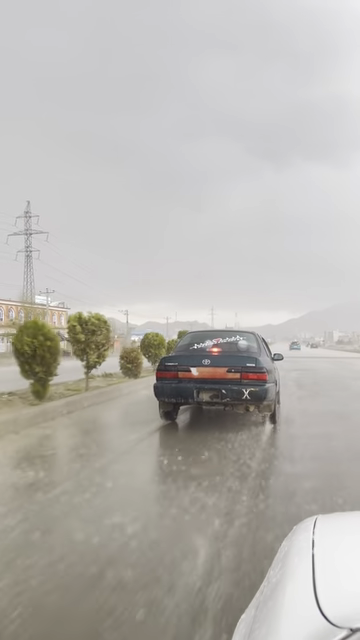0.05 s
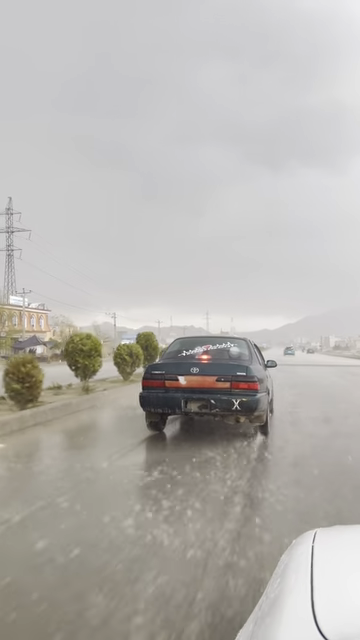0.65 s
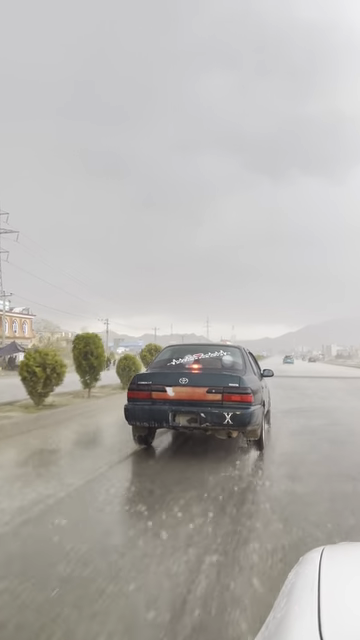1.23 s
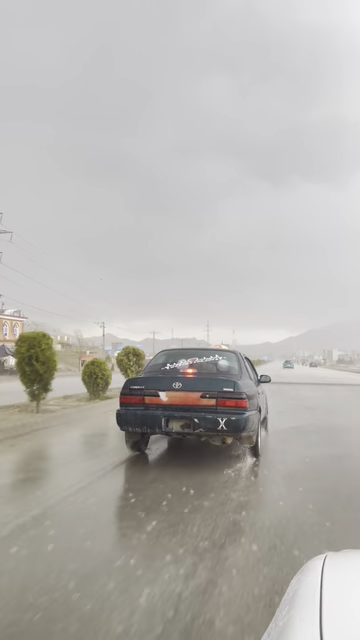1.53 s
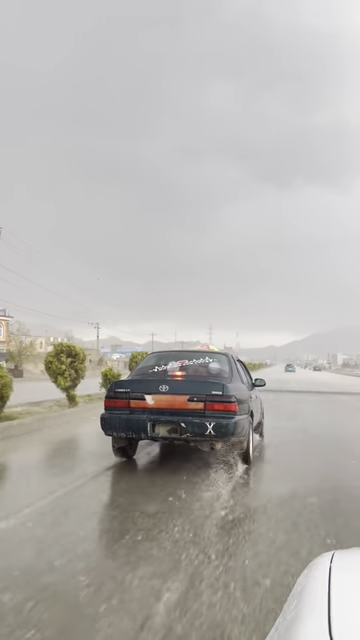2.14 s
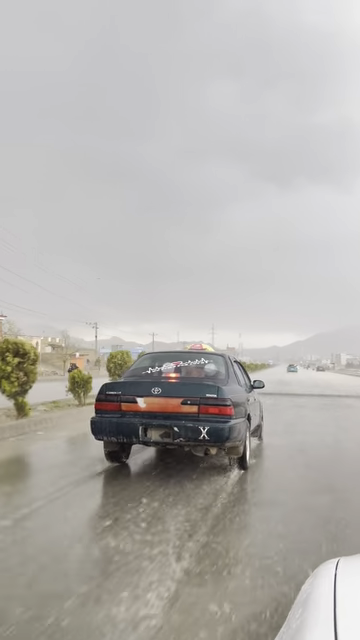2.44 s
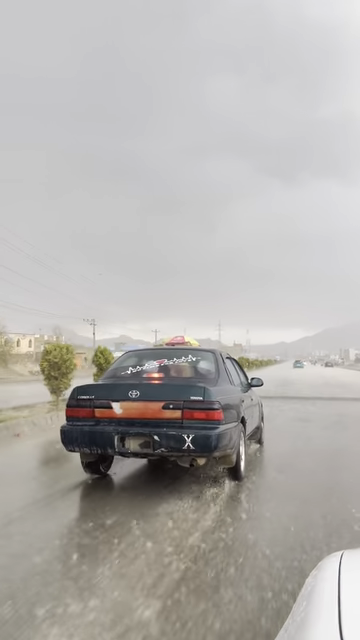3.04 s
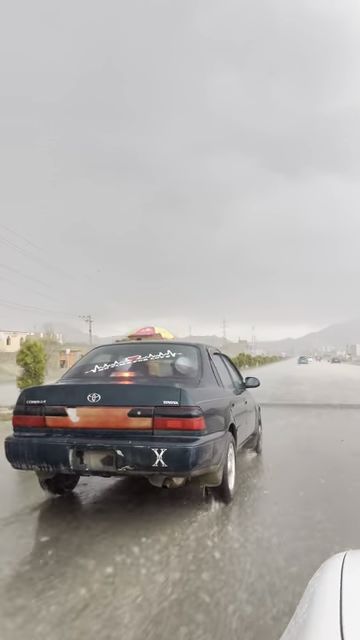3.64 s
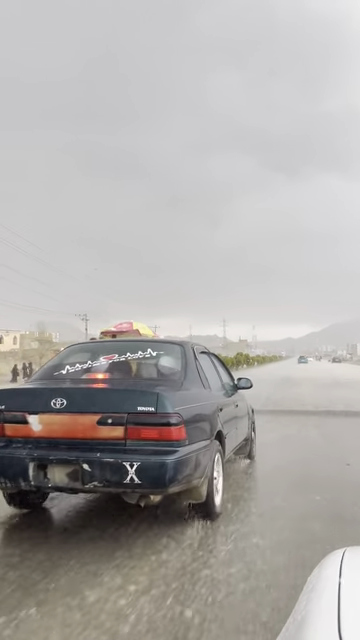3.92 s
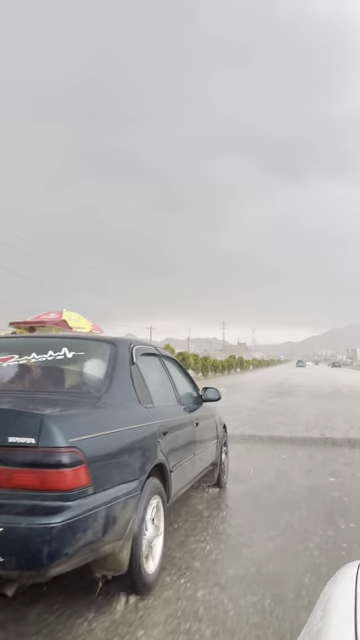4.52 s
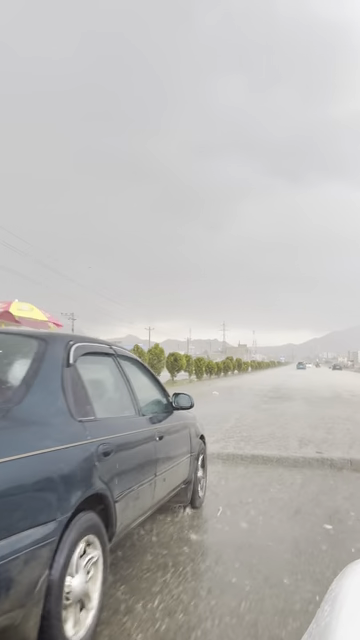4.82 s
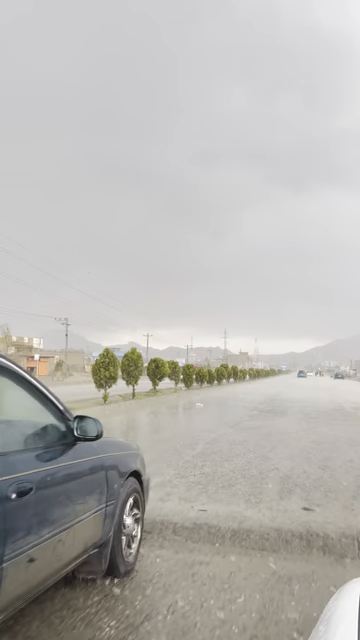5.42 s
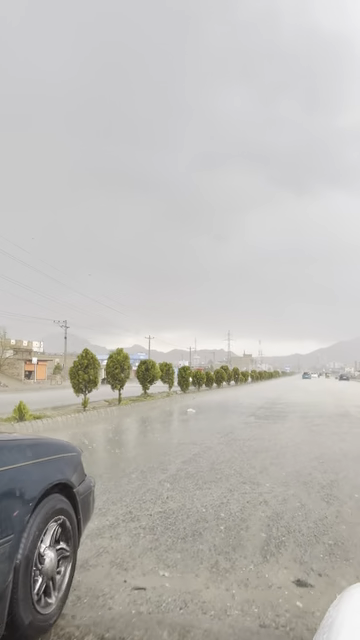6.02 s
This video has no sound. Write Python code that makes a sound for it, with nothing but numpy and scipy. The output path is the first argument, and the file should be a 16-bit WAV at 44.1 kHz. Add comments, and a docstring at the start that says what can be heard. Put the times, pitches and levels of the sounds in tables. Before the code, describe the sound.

From the open window of a slowing car on a wet road, rough, rumbling gusts hit the microphone, along with close slaps of raindrops. Rain and tyre spray hiss underneath, and a very high, raspy whistle pulses in lengthening swells. One heavy drop briefly ducks the wind, and later a hard gust cracks. The wind fades, ending with the short beginning of a brake squeal.

```python
"""Riding through heavy rain with a phone held at the open window of a car that slows almost to a stop.
From the start, wind buffets the two microphone ports in eddies, over the hiss of rain and tyre spray.
A thin, ragged whistle comes in, swelling about once a wheel turn. Droplets spatter the phone and big
drops slap it; one heavy hit briefly ducks the wind and spray. As the wind eases, the whistle's swells
grow longer and fray, one hard gust cracks at the ports, and at the very end a brake starts to squeal."""
import sys
import numpy as np
from scipy import signal
from scipy.fft import rfft, irfft, next_fast_len
from scipy.io import wavfile
from scipy.ndimage import uniform_filter1d, map_coordinates

SR = 44100
rng = np.random.default_rng(int(sys.argv[2]) if len(sys.argv) > 2 else 0)


def wav_record(signal):
    """Record a signal, one row per channel, as 16-bit PCM in the file named by sys.argv[1]."""
    frames = np.transpose(np.atleast_2d(signal))
    bounded = np.clip(frames, -1, 1)
    # unit amplitude maps onto the largest positive 16-bit level
    quanta = np.round(bounded * 32767).astype(np.int16)
    wavfile.write(sys.argv[1], SR, quanta)


N = 276366
TIME = np.arange(N) / SR
SIZE = next_fast_len(N + 4096)
FREQS = np.maximum(np.arange(SIZE // 2 + 1) * SR / SIZE, 1)

# each port's own small swirls against the shared wind, strongest in fast air: time_s, level_db
PORT_SWIRLS = [(0, -1.5), (.7, -1.5), (1, -50), (6.27, -15)]
# stereo width of the water sounds, side against mid: frequency_hz, side_db
WATER_WIDTH = [(80, 1.5), (700, -1), (2000, -16.5), (3300, -1.5), (5000, -6), (7000, -19), (9500, -47)]
# tone of a splash on the phone: frequency_hz, gain_db
SPLASH_COLOUR = [(200, -14), (1000, -6), (3000, -1), (6000, 1), (8000, -2), (10500, 5), (13000, -13),
                 (16000, -34)]


def undb(db):
    """Decibels to gain."""
    return 10 ** (np.asarray(db) / 20)


def unit(x):
    """Scale to rms 1."""
    return x / np.sqrt(np.mean(x ** 2) + 1e-20)


def curves(table):
    """One envelope for each value column of (time_s, value, ...) rows."""
    times, *columns = np.transpose(table)
    return [np.interp(TIME, times, column) for column in columns]


def shape(x, response):
    """Multiply the spectrum of x by a response."""
    return irfft(rfft(x, SIZE) * response, SIZE)[..., :N]


def colour(x, points):
    """Equalise x along (frequency_hz, gain_db) points."""
    hz, db = np.transpose(points)
    return shape(x, undb(np.interp(np.log(FREQS), np.log(hz), db)))


def butter(x, hz, kind, order=2):
    """Causal low-, high- or band-pass."""
    return signal.sosfilt(signal.butter(order, np.clip(hz, 5, .45 * SR), kind, fs=SR, output="sos"), x)


def band_rms(x, band_hz):
    """Rms of x between two frequencies."""
    return np.std(butter(x, band_hz, "bandpass", order=3))


def walk(rate_hz):
    """Smooth random wandering of spread 1."""
    return unit(shape(rng.standard_normal(N), 1 / (1 + (FREQS / rate_hz) ** 2)))


def flutter(x, depth_db):
    """Turn a wandering into a flickering gain of even short-term power."""
    gain = undb(depth_db * 2 * np.tanh(x / 2))
    return gain / np.sqrt(uniform_filter1d(gain ** 2, size=3500))


def ports(pair, width):
    """Two unrelated signals become left and right: one is the mid, the other, equalised, the side."""
    side = colour(pair[1], width)
    return np.array([pair[0] + side, pair[0] - side])


def add(out, x, start_s):
    """Mix x into out from start_s on."""
    i = int(np.clip(start_s * SR, 0, N - 1))
    out[..., i:i + x.shape[-1]] += x[..., :N - i]


def dip_db(recover_s=0.16):
    """How far wind and spray duck after the heaviest drops."""
    # level steps after a hit, negative for a slight lift: start_s, depth_db
    dips = [(.442, -0.5), (.656, -1), (2.363, 25)]
    return sum(depth_db * (TIME > s) * np.exp(-np.abs(TIME - s) / recover_s) for s, depth_db in dips)


def airflow(attack_s=0.018, release_s=0.0092):
    """Rumble and buffeting envelopes in dB: the steady flow, lifted by gusts and lowered by lulls."""
    # steady airflow, easing as the car slows: time_s, rumble_db, buffet_db
    steady_flow = [(0, -14.5, -17.5), (.17, -12.5, -26.5), (.45, -15, -21.5), (.7, -17, -24),
                   (.9, -18, -23.5), (1.35, -15.5, -27), (1.55, -22, -33.5), (1.72, -30.5, -38),
                   (1.95, -24, -31), (2.3, -24.5, -28), (2.6, -20, -27), (3.0, -26, -27.5),
                   (3.3, -31.5, -39), (3.65, -27.5, -34.5), (4.8, -26.5, -32.5), (5.75, -34.5, -46),
                   (6.1, -56, -56), (6.27, -45, -44)]
    # gusts on top of it: start_s, length_s, rumble_gain_db, buffet_gain_db
    gusts = [(0.197, 0.03, 0, 7), (0.255, 0.088, 1, 6), (0.961, 0.026, 6, 2.5), (1.045, 0.17, 4.5, 2),
             (2.096, 0.16, 7, 1), (2.264, 0.092, 9.5, 8), (2.705, 0.051, 5.5, 3.5), (3.045, 0.072, 7.5, 2),
             (3.14, 0.087, 3.5, -0.5), (3.443, 0.083, 5, 11), (3.606, 0.14, 1.5, 3), (4.044, 0.12, 1.5, 1),
             (4.387, 0.03, 6.5, 6), (4.47, 0.06, 4, -0.5), (4.59, 0.077, 7.5, -1), (4.943, 0.063, 9, 0),
             (5.027, 0.057, 6.5, 7), (5.185, 0.072, 9, 4), (5.266, 0.032, 4, 7), (5.418, 0.038, 11.5, 9.5),
             (5.554, 0.017, 10, 3), (5.648, 0.03, 8.5, 8)]
    # the airflow lets go of the phone: centre_s, half_width_s, depth_db
    lulls = [(0.128, 0.007, 14), (.175, 0.01, 2), (0.251, 0.018, 6.5), (.5, 0.0055, 7.5), (.83, 0.02, 2),
             (0.936, 0.015, 12), (1.132, 0.0048, 4), (2.672, .007, -1), (2.92, .015, 1), (2.99, 0.016, 0),
             (3.358, 0.026, 8), (3.59, 0.009, 4), (3.93, 0.0092, 3), (4.21, 0.022, 13.5), (4.42, 0.019, 10),
             (4.731, 0.0083, 18), (4.8, 0.031, 7.5), (4.905, .014, 1), (5.02, 0.0079, 5), (5.125, 0.019, 5),
             (5.385, .014, -1), (5.51, 0.024, 3), (5.615, 0.024, 8)]
    rumble, buffet = curves(steady_flow)
    for start, length, rumble_db, buffet_db in gusts:
        ramps = np.minimum((TIME - start) / attack_s, (start + length - TIME) / release_s)
        gust = np.clip(ramps + .5, 0, 1)
        rumble, buffet = rumble + rumble_db * gust, buffet + buffet_db * gust
    lull = dip_db() + sum(db * np.exp(-((TIME - s) / width) ** 2) for s, width, db in lulls)
    return rumble - lull, buffet - lull


def swirls(per_second=75, fade_s=0.00036):
    """Local air speed: it wanders, and jumps whenever a small vortex breaks on the phone."""
    kicks = (rng.random(N) < per_second / SR) * rng.uniform(0.14, 5.3, N)
    kicks = butter(signal.lfilter([1], [1, -np.exp(-1 / (fade_s * SR))], kicks), 330, "lowpass")
    return unit(unit(kicks - kicks.mean()) + 1.9 * walk(13.5) + 0.98 * walk(220))


def wind(rumble_db=1.5, hard_gust_db=-13, roar_db=3, merge=0.41):
    """Turbulence at the ports: each swirl starts with a rough edge, and the lows follow it."""
    # tone of the rushing air: frequency_hz, gain_db
    air_colour = [(20, -21), (40, -2.5), (70, 0.5), (130, -6), (250, -9.5), (350, -7.5), (700, -15),
                  (1300, -19.5), (2300, -22), (3500, -33.5), (5000, -35), (8000, -42), (10200, -49),
                  (13000, -111)]
    # four bands of air noise that trail the swirl: centre_hz, flutter_db, lag_ms
    registers = [(95.5, 2.5, 5.2), (335, 7, 3.1), (1020, 8, 3.15), (3900, 10.5, 3.1)]
    rumble, buffet = airflow()
    fast = undb(curves(PORT_SWIRLS)[0])
    noise = colour(rng.standard_normal((2, N)), air_colour)
    # in the fastest airflow the swirls merge into a denser roar
    swirl = swirls() * (1 - np.clip(merge * fast, 0, 1))
    low = undb(rumble + rumble_db) / band_rms(noise, [30, 160])
    body = undb(buffet) / band_rms(noise, [250, 2500])
    roar = body * undb(roar_db * fast)
    # only a hard gust reaches up into the treble
    treble = body * undb(0.57 * np.minimum(buffet - hard_gust_db, 0))
    log_centres = np.log(np.array(registers)[:, 0])
    out = 0
    for (_, flutter_db, lag_ms), level, solo in zip(registers, [low, roar, body, treble], np.eye(4)):
        band = shape(noise, np.interp(np.log(FREQS), log_centres, solo))
        late_swirl = np.interp(TIME - lag_ms / 1000, TIME, swirl)
        out = out + band * level * flutter(late_swirl, flutter_db)
    return out


def buffeting(small_hz=650, deep_hz=52):
    """Large swirls press on both ports nearly alike; small fast ones reach each port separately."""
    # low shelf on the wind's deepest bass: time_s, gain_db
    deep_bass = [(0, -7), (1.3, -8), (1.7, 2.5), (2.7, 3.5), (3.6, 4), (4.8, -2), (6.27, -3)]
    # low swirls that reach the ports unequally, against the shared wind: time_s, level_db
    crosswind = [(1.5, -22), (2.2, -14), (2.7, -14), (3.3, -19), (3.9, -17), (4.25, -12), (4.6, -21),
                 (4.93, -19), (5.08, -3), (5.4, -12.5), (5.7, -18)]
    # tone of those swirls: frequency_hz, gain_db
    crosswind_colour = [(40, -3), (100, -7.5), (200, -1.5), (450, -4), (900, -12), (1600, -34)]
    # stereo width of the wind, side against mid: frequency_hz, side_db
    wind_width = [(60, -112), (180, -71), (350, -20), (700, -13.5), (1500, -28.5), (3500, 0), (7000, -40)]
    air = wind()
    sub = shape(air, 1 / (1 + (FREQS / deep_hz) ** 6))
    air = air + sub * (undb(curves(deep_bass)[0]) - 1) + eddies()
    side = butter(air[1], small_hz, "highpass", order=4) * undb(curves(PORT_SWIRLS)[0])
    side += colour(air[1], crosswind_colour) * undb(curves(crosswind)[0])
    return ports(air, wind_width) + np.array([side, -side])


def rain(hiss_db=-2, patter_db=-8, per_second=1400, spread_db=4):
    """Spray hisses evenly; countless drops patter through it, a few of them close."""
    # the bed of rain and tyre spray: time_s, level_db
    spray = [(0, -42.5), (.5, -51), (1, -49), (1.5, -47.5), (2, -47), (2.8, -47.5), (3.8, -49.5),
             (5.3, -50), (6.27, -49.5)]
    # tone of that bed: frequency_hz, gain_db
    rain_colour = [(25, -71), (70, -59.5), (150, -70), (400, -73.5), (1100, -68.5), (2000, -74.5),
                   (2600, -73.5), (5000, -77.5), (6500, -77), (8700, -73), (9350, -73.5), (10100, -68.5),
                   (11000, -75), (12000, -85.5), (13500, -106), (16000, -125)]
    hiss = rng.standard_normal((2, N)) * undb(0.88 * walk(22))
    sizes = undb(spread_db * np.minimum(rng.exponential(size=N), 4)) * rng.standard_normal((2, N))
    patter = unit(sizes * (rng.random(N) < per_second / SR))
    hiss_rms = band_rms(colour(hiss, rain_colour), [5200, 7000])
    bed = colour(undb(hiss_db) * hiss + undb(patter_db) * patter, rain_colour) / hiss_rms
    return ports(bed * undb(curves(spray)[0] - dip_db()), WATER_WIDTH)


def tyres(band_hz=(900, 2400), unrest_db=2.1):
    """The tyres push water aside in a continuous wash."""
    # the wash, fading as the car slows: time_s, level_db
    wash_levels = [(0, -42), (1.7, -36.5), (2.7, -38), (3.4, -44.5), (4.5, -57), (6.27, -49)]
    wash = unit(butter(rng.standard_normal((2, N)), band_hz, "bandpass", order=3))
    return ports(wash * undb(curves(wash_levels)[0] - dip_db() + unrest_db * walk(19)), WATER_WIDTH)


def thump(t, start_hz, end_hz, fall_s, decay_s):
    """A pressure jolt in the port: it rings out while its pitch sinks."""
    turns = end_hz * t + (start_hz - end_hz) * fall_s * (1 - np.exp(-t / fall_s))
    return np.sin(2 * np.pi * turns) * np.exp(-t / decay_s)


def eddies(thump_trim_db=-1, rise_s=0.002, sink_s=0.003965, first_speed=1.45, last_speed=0.409):
    """Single eddies slap the ports: a short, ragged burst that sinks in pitch, then a low swing."""
    # the strongest eddies: start_s, peak_db, thump_db, brightness_db
    slaps = [(.022, -21, -13, -9), (0.055, -20, -25, -12), (0.097, -8, -8, -10.5), (0.142, -10.5, -15, -14),
             (0.203, -5.5, -19, -9), (.211, -11.5, -15, -7), (0.277, -3.5, -16, -3.5),
             (0.304, -8, -2.5, -12), (.323, -3.5, -11, -10), (.348, -8, -14, -14), (0.366, -2.5, -4.5, 5),
             (.41, -17, -13, -22), (0.429, -6.5, -5, -3), (0.509, -8, -10, -3), (0.583, -15, -25, 2),
             (.727, -9, -28, -14.5), (0.757, -8, -11, -4), (.797, -13.5, -16, -8), (.876, -12, -17, -4),
             (0.953, -19, -20, -12), (.977, -13, -19, -6), (0.997, -7.5, -33, 5), (1.024, -24, -28, -3),
             (1.05, -15, -16, -8), (1.075, -12, -10, -18), (1.108, -11, -10.5, -10), (1.141, -4.5, -15, -8),
             (1.156, -8, -23, -8), (1.186, -10, -16, -23), (1.215, -12.5, -16, -10), (1.359, -14, -16, -4),
             (1.444, -26, -22, -8), (1.599, -21, -21, -8), (1.85, -17, -22, -6), (1.945, -15.5, -12.5, -11),
             (1.995, -9, -36, -16), (2.023, -12, -16, -8), (2.139, -10.5, -33, -9),
             (2.205, -11.5, -17, -19), (2.275, -13.5, -28, -5), (2.307, -5, -30, -14),
             (2.343, -30, -20, -6), (2.428, -29, -26, -14), (2.509, -20, -35, -18),
             (2.529, -17.5, -31, -21), (2.579, -16, -24, -14.5), (2.62, -15.5, -17, -16),
             (2.649, -13.5, -18, -15), (2.681, -9, -30, -17.5), (2.698, -12.5, -18, -20),
             (2.725, -15, -15, -17), (2.768, -24, -25, -24), (2.81, -16, -34, -13), (2.831, -17, -16, -16),
             (2.902, -20, -21, -20), (2.944, -12, -26, -12), (3.024, -14.5, -30, -15),
             (3.066, -24, -18, -14), (3.123, -14, -17, -11), (3.195, -18.5, -25, -20),
             (3.452, -12.5, -22, -14), (3.498, -17, -26, -7), (3.633, -24, -23, -19),
             (3.668, -24, -20.5, -24), (3.692, -18, -16, -27.5), (4.0, -12, -22, -14.5),
             (4.005, -13, -14, -13), (4.052, -27, -19, -17), (4.167, -13.5, -34, -16.5),
             (4.309, -19, -13, -29), (4.351, -30, -14, -28), (4.376, -21, -17, -23), (4.388, -20, -22, -19),
             (4.464, -16, -36, -26), (4.473, -23, -24, -21), (4.4926, -13.5, -30, -13),
             (4.501, -10, -14, -15), (4.514, -13, -15, -21), (4.534, -24, -28, -17), (4.554, -14, -18, -17),
             (4.569, -20, -19, -23), (4.591, -2.5, -16, -5), (4.594, -4.5, -11.5, -4.5),
             (4.6, -13.5, -10, -3), (4.643, -14.5, -12, -5), (4.684, -12, -31, -34), (4.744, -18, -40, -26),
             (4.86, -13.5, -15.5, -17), (4.947, -15, -24, -23), (4.953, -11, -12.5, -27.5),
             (4.967, -19, -23, -26), (4.991, -13.5, -16, -17.5), (5.004, -26, -28, -20),
             (5.04, -19, -18, -12), (5.055, -12, -27, -21.5), (5.06, -12.5, -16, -19),
             (5.072, -22, -15, -18), (5.184, -17.5, -16, -23.5), (5.201, -16, -13.5, -15),
             (5.267, -10, -16, -27), (5.308, -20, -30, -22), (5.35, -20.5, -15.5, -28),
             (5.407, -12.5, -41, -20.5), (5.43, -18, -18.5, -24), (5.559, -36, -23, -36),
             (5.664, -22.5, -25, -36)]
    out, t = np.zeros((2, N)), np.arange(4096) / SR
    for start, peak_db, thump_db, brightness_db in slaps:
        # eddies are longer and deeper while the car is still fast
        bulk = 1 + 0.62 * np.exp(-start / 2)
        cutoff_hz = min(2900, 2450 * undb(0.59 * (brightness_db + 7.5)))
        noise = butter(rng.standard_normal((2, len(t))), [400 / bulk, 1400 / bulk], "bandpass", order=1)
        noise = butter(noise, cutoff_hz, "lowpass", order=4)
        # reading the noise ever more slowly bends it down
        speed = last_speed + (first_speed - last_speed) * np.exp(-t / (sink_s * bulk))
        bent = np.array([map_coordinates(row, [np.cumsum(speed)], mode="mirror") for row in noise])
        burst = bent * t * np.exp(-t / (rise_s * bulk))
        burst *= undb(peak_db) / np.abs(burst).max(axis=1, keepdims=True)
        end_hz = 62 * np.exp(0.35 * rng.standard_normal())
        swing = thump(t, start_hz=418, end_hz=end_hz, fall_s=0.0057, decay_s=0.0081)
        add(out, burst + rng.choice([-1, 1]) * undb(thump_db + thump_trim_db) * swing, start)
    return out


def swells(base_roughness=0.248, arch_hz=800, fade_s=0.032, leap_s=0.0131, surge_arch_hz=180):
    """The whistle's pitch, gain, roughness and leap (0-1): swells arch, surges jump to higher stages."""
    # swells of the whistle: start_s, length_s, pitch_hz, level_db
    arches = [(.09, 0.11, 8550, -37), (.29, .12, 8600, -37), (0.47, 0.18, 8420, -43),
              (.69, 0.18, 7930, -45.5), (0.904, 0.17, 7100, -48), (1.192, 0.18, 7000, -50),
              (1.65, 0.074, 8070, -38), (1.773, 0.18, 8280, -37), (2.007, 0.18, 8550, -37),
              (2.248, 0.13, 8100, -38.5), (2.529, 0.21, 8200, -38.5), (2.79, 0.22, 8600, -31.5),
              (3.088, .255, 8460, -32.5), (3.402, 0.32, 8500, -30), (3.78, .33, 8460, -34.5),
              (4.213, 0.41, 8520, -31), (4.749, 0.53, 8740, -29), (5.642, .17, 7580, -45)]
    # leaps to a higher stage: start_s, length_s, pitch_hz, gain_db, roughness (0-1)
    surges = [(2.54, .055, 10600, 0.5, 0), (2.593, 0.049, 9600, 1, .6), (2.853, 0.089, 9500, -5, 0.5),
              (3.122, 0.062, 9780, 4, 0), (3.186, .064, 9360, -4, 0.2), (3.449, .088, 9830, 0.5, .75),
              (3.528, .067, 9270, 4, .45), (3.638, 0.031, 9300, 0, .6), (3.826, 0.082, 9600, 9, 0.7),
              (3.945, 0.035, 9220, 8, 0.2), (4.252, 0.072, 10040, 2.5, 0.5), (4.304, 0.048, 9700, 4, 0.3),
              (4.4, .043, 9120, 7, 0.4), (4.797, .04, 9200, 9, 0), (4.818, 0.18, 9770, 5.5, 0.03),
              (4.985, 0.12, 9970, 9.5, .3), (5.062, .035, 9300, 7, .15), (5.085, .062, 8980, 2, 0.5),
              (5.132, 0.073, 9100, 7, 0.2)]
    hz, rough = np.full(N, 8000.), np.full(N, base_roughness)
    gain, lift_db, leap = np.zeros((3, N))
    for start, length, pitch_hz, level_db in arches:
        on = (TIME >= start) & (TIME < start + length)
        t = TIME[on] - start
        hz[on] = pitch_hz - arch_hz * np.abs(2 * t / length - 1) ** 4
        gain[on] = undb(level_db) * np.minimum(np.minimum(t, length - t) / fade_s, 1)
    for start, length, pitch_hz, gain_db, roughness in surges:
        t = TIME - start
        blend = np.clip(np.minimum(t, length - t) / leap_s + .5, 0, 1)
        arch = np.clip(1 / 3 - (2 * t / length - 1) ** 2, -1, 1)
        hz += blend * (pitch_hz + surge_arch_hz * arch - hz)
        lift_db += blend * (gain_db - lift_db)
        rough += blend * (roughness - rough)
        leap = np.minimum(leap + blend, 1)
    return hz, gain * undb(lift_db), np.clip(rough, 0, 1), leap


def whistle(trim_db=1, lower_db=-21, lower_hz=8000, shreds_per_second=130):
    """A raspy air whistle that steps between stages; driven hard, it frays into short shreds."""
    hz, gain, rough, leap = swells()
    shred = np.cumsum(rng.random(N) < shreds_per_second / SR)
    pitch_hops = uniform_filter1d(rng.uniform(-0.89, 1, N)[shred], size=40)
    phase = 2 * np.pi * np.cumsum(hz * (1 + .005 * walk(50) + .036 * rough * pitch_hops)) / SR
    rasp = unit(butter(rng.standard_normal((2, N)), 200, "lowpass", order=3))
    fray = unit(butter(rng.standard_normal((2, N)), 260, "lowpass", order=4))
    # roughness trades the pure tone for a narrow band of noise around it
    grit = .42 * rasp * np.sqrt(1 - rough) + fray * np.sqrt(rough / 2)
    tone = (.8 * np.sqrt(1 - rough) + grit[0]) * np.sin(phase) + grit[1] * np.cos(phase)
    # the lowest stage keeps sounding faintly under a surge
    lower = undb(lower_db) * leap * walk(160) * np.sin(2 * np.pi * lower_hz * TIME)
    return unit((tone + lower) * flutter(walk(70), depth_db=4)) * gain * undb(trim_db)


def spatter(per_second=130, splash_s=0.00067, cutoff_hz=7500):
    """Fine droplets burst on the phone in quick, uneven succession."""
    # one flurry, cut off at its last point: time_s, level_db
    flurry = [(.25, -58), (.37, -49), (.45, -36), (.55, -38), (.66, -35), (.72, -54), (.95, -54)]
    hits = (rng.random(N) < per_second / SR) * rng.uniform(0.41, 1, N)
    decays = signal.lfilter([1], [1, -np.exp(-1 / (splash_s * SR))], hits)
    splashes = colour(decays * rng.standard_normal((2, N)), SPLASH_COLOUR)
    splashes = unit(butter(splashes, cutoff_hz, "lowpass", order=4))
    return ports(splashes * undb(curves(flurry)[0]) * (TIME < flurry[-1][0]), WATER_WIDTH)


def sharp_hits(tick_db=12, thump_trim_db=-1, plop_db=1, heavy_db=-15, fine_db=-26, fine_hz=5500):
    """Drops slap the phone and one hard gust cracks; heavy hits also plop and jolt the air in the port."""
    # sharp hits at the ports: drops, and at 4.595 s the crack of a hard gust:
    # start_s, level_db, thump_db, decay_ms, cutoff_hz
    hits = [(0.283, -25, -22, 1.5, 7500), (.367, -15, -6.5, 0.99, 7500), (0.3724, -14.5, -15, 3.2, 7500),
            (0.4047, -24, -22, 1.5, 7500), (0.4396, -14, -9.5, 2.2, 11300), (0.454, -13, -10.5, 0.63, 7500),
            (0.469, -14, -27, 0.53, 9000), (0.515, -23, -16, 1.2, 7500), (0.532, -10.5, -10, 0.65, 7500),
            (0.544, -19, -14, 1.3, 7500), (0.6026, -15.5, -28, 2.4, 9500), (0.618, -17, -9, 2.9, 8500),
            (0.654, -11, -27, 1.8, 6960), (0.666, -10, -11, 1, 7500), (0.86, -22, -24, 0.72, 7000),
            (1.485, -25.5, -34, 0.6, 13000), (1.9168, -27, -31, .5, 13000), (2.365, -8.5, -6.5, 0.87, 8750),
            (2.395, -10.5, -14.5, 0.19, 6630), (2.743, -26, -30, .4, 15100), (2.771, -25, -32, 0.46, 15000),
            (3.1127, -29, -33, .5, 15000), (4.156, -25, -33, 0.57, 12000), (4.595, -22.5, -30, 1.6, 6540),
            (5.023, -21, -21, 0.45, 11000), (5.22, -25, -8, .5, 15000), (5.971, -26.5, -39, 0.68, 9200)]
    ticks, jolts, t = np.zeros((2, N)), np.zeros(N), np.arange(4096) / SR
    for start, level_db, thump_db, decay_ms, cutoff_hz in hits:
        tick = rng.standard_normal((2, len(t))) * np.exp(-t * 1e3 / decay_ms)
        tick[0] += 0.55 * np.exp(-t / 0.00048)  # the slap, in the centre
        # the lighter the hit, the thinner its tick
        tick = butter(tick, fine_hz * min(1, undb(2 * (fine_db - level_db))), "highpass")
        tick *= undb(level_db + tick_db) / np.abs(tick).max()
        add(ticks, butter(tick, cutoff_hz, "lowpass", order=4), start)
        weight = min(1, undb(level_db - heavy_db))
        plop = thump(t, start_hz=2410, end_hz=388, fall_s=0.0006, decay_s=0.0011)
        swing = thump(t, start_hz=700, end_hz=87, fall_s=0.0037, decay_s=0.023)
        jolt = undb(level_db + plop_db) * plop + undb(thump_db + thump_trim_db) * swing
        add(jolts, weight * jolt, start)
    return ports(colour(ticks, SPLASH_COLOUR), WATER_WIDTH) + jolts


def brake(pitch_hz=2255, waver=0.0024):
    """A brake pad starts to sing as the wheels slow."""
    # envelope of the squeal: time_s, level_db
    squeal = [(6.08, -79), (6.155, -48), (6.215, -41), (6.25, -33), (6.27, -46)]
    # the pad's partials: harmonic_number, level_db
    partials = [(1, -2), (2, -13), (3, -25)]
    phase = 2 * np.pi * np.cumsum(pitch_hz * (1 + waver * walk(40.5))) / SR
    tone = sum(undb(db) * np.sin(round(harmonic) * phase) for harmonic, db in partials)
    return unit(tone) * undb(curves(squeal)[0])


def narrow_bass(x):
    """In strong wind the bass is the same left and right: the side is cut below a sliding corner."""
    # the bass is mono below this corner: time_s, corner_hz
    mono_below = [(0, 530), (1.1, 510), (1.7, 310), (2.2, 160), (2.7, 70), (3.3, 20)]
    mid, side = (x[0] + x[1]) / 2, (x[0] - x[1]) / 2
    corner_hz, = curves(mono_below)
    steps_hz = np.geomspace(30, 520, 6)
    high_side = 0
    for hz, solo in zip(steps_hz, np.eye(len(steps_hz))):
        crossfade = np.interp(corner_hz, steps_hz, solo)
        high_side = high_side + crossfade * shape(side, 1 / (1 + (hz / FREQS) ** 10))
    return np.array([mid + high_side, mid - high_side])


def scene():
    """Everything as it meets the two ports."""
    return buffeting() + sharp_hits() + spatter() + rain() + whistle() + tyres() + brake()


def record(dry):
    """The ports skew the treble's phase; the phone trims both ends, rounds peaks and narrows the bass."""
    # how far the left port leads the right: frequency_hz, phase_rad
    port_phase = [(2500, 0), (4200, 1), (4850, 3.14), (5800, 6.2), (7500, 8.1), (9350, 9.42), (11000, 11.1),
                  (11900, 12.57)]
    low_cut_hz, top_hz, ceiling = 39.3, 15800, .95
    lead = np.interp(FREQS, *np.transpose(port_phase))
    x = shape(dry, np.exp(.5j * lead * np.array([[1], [-1]])))
    x = butter(x, low_cut_hz, "highpass")
    rounded = x / (1 + (x / ceiling) ** 4) ** (1 / 4)
    return signal.sosfilt(signal.ellip(8, .2, 70, top_hz, fs=SR, output="sos"), narrow_bass(rounded))


dry = scene()
out = record(dry)
wav_record(out)
```